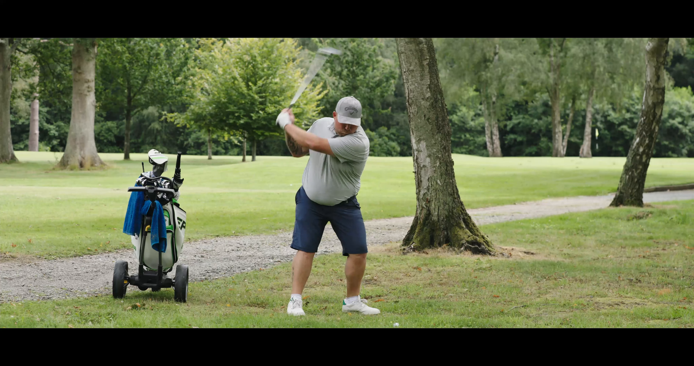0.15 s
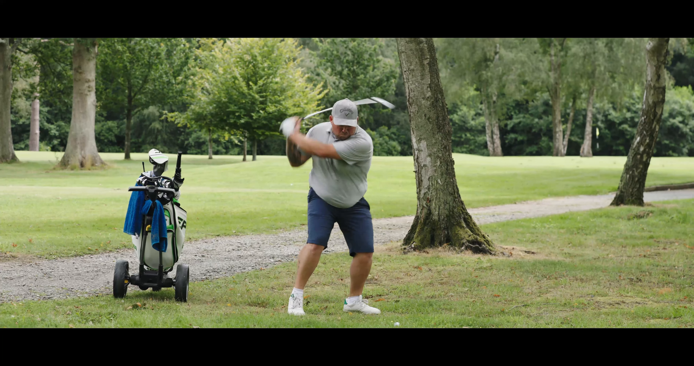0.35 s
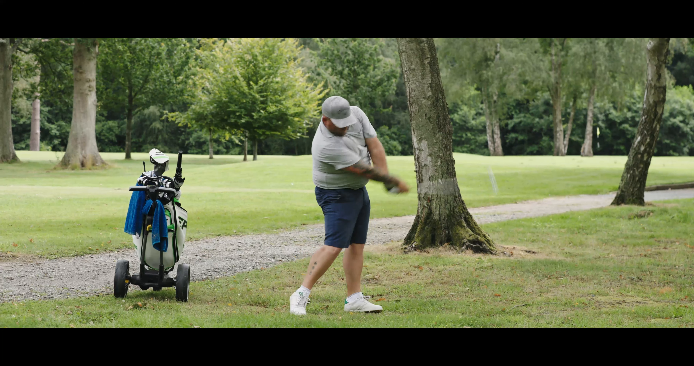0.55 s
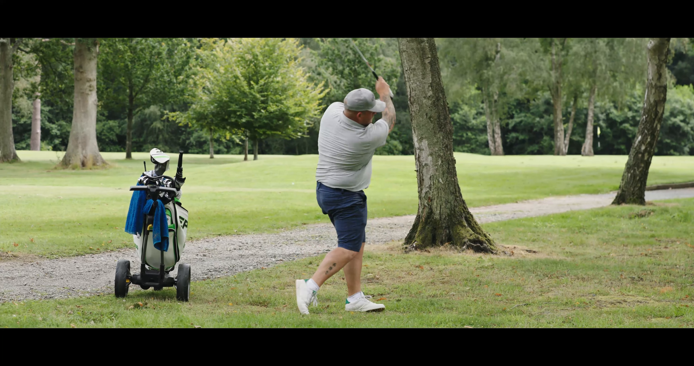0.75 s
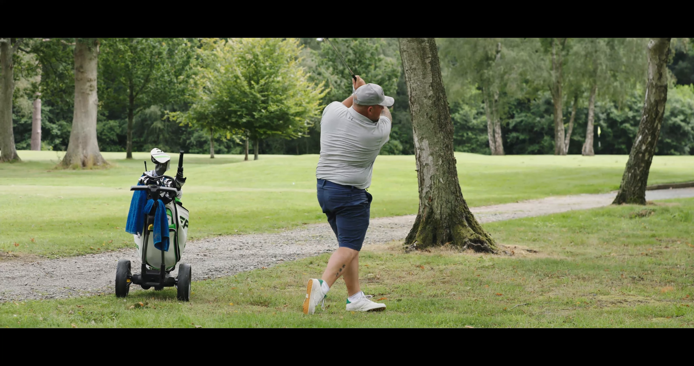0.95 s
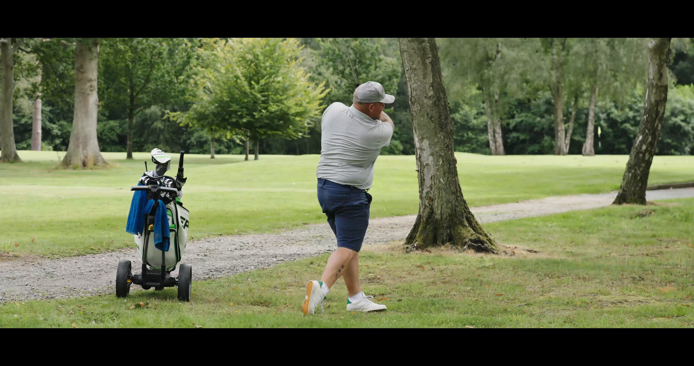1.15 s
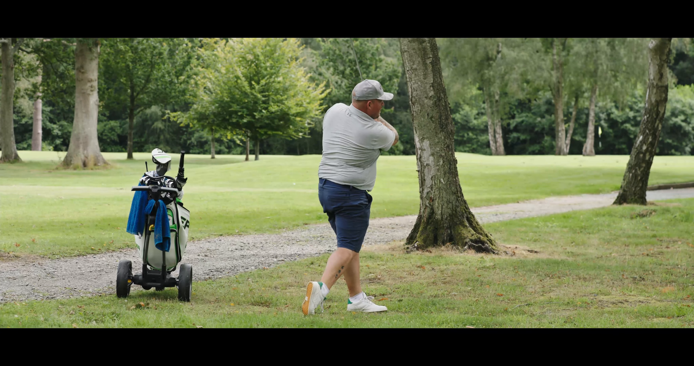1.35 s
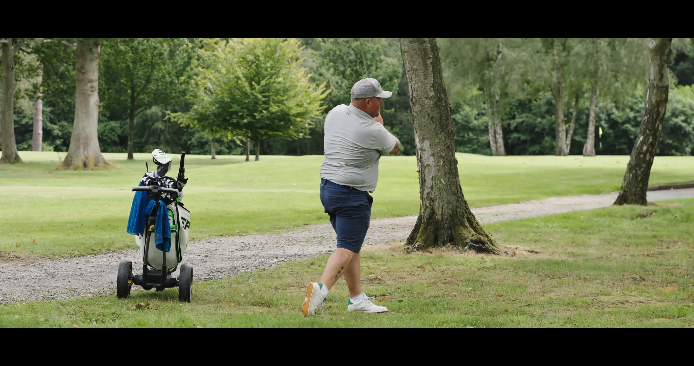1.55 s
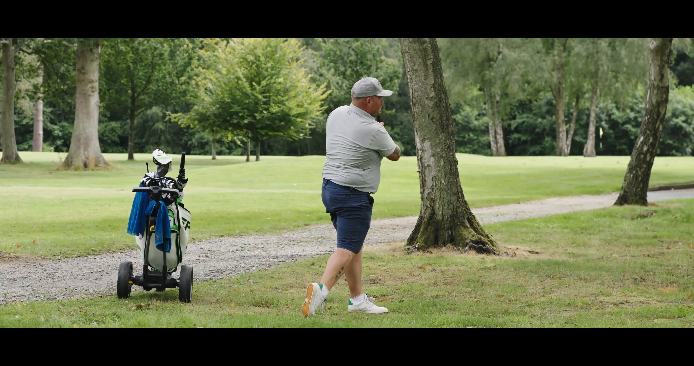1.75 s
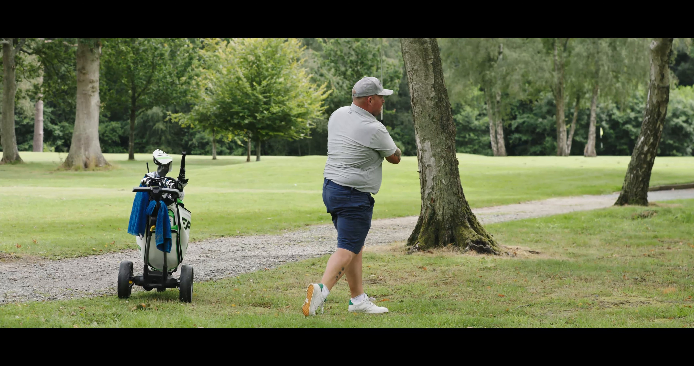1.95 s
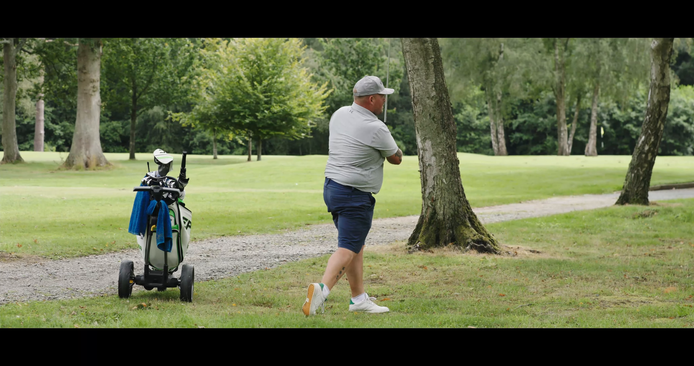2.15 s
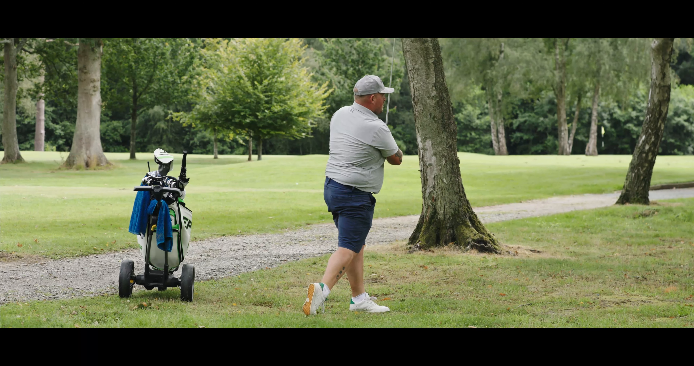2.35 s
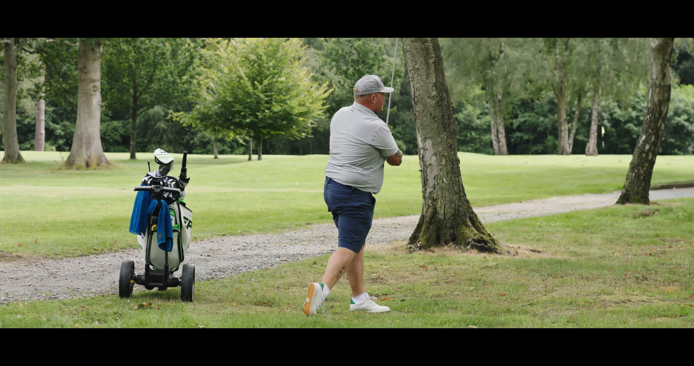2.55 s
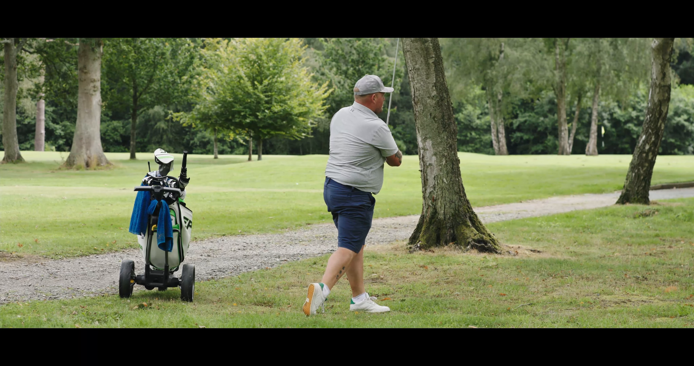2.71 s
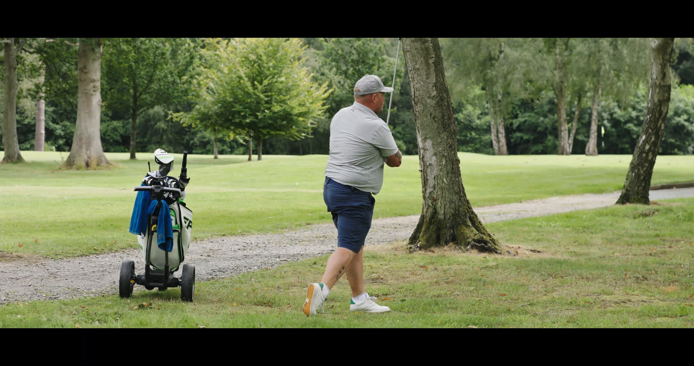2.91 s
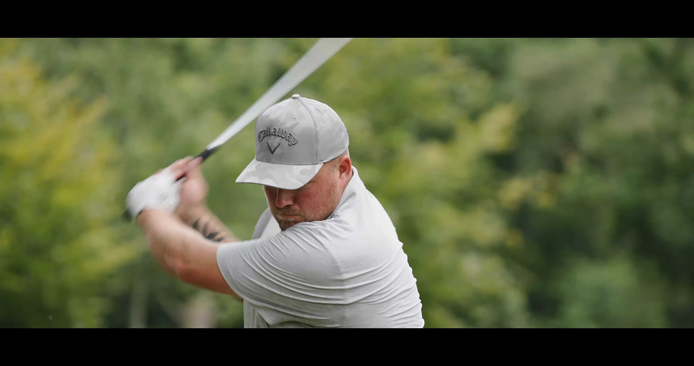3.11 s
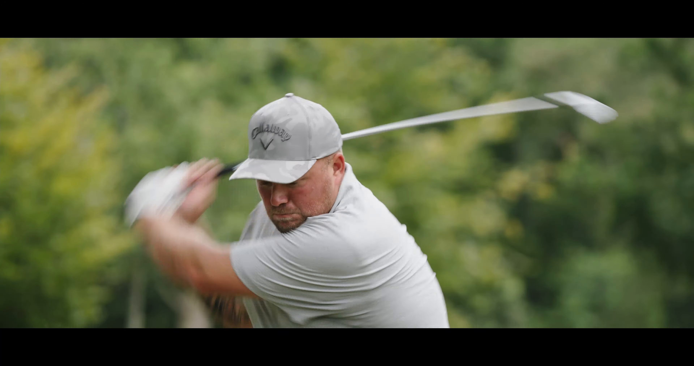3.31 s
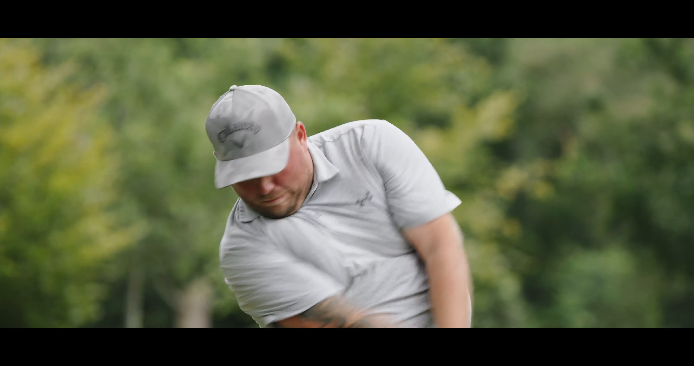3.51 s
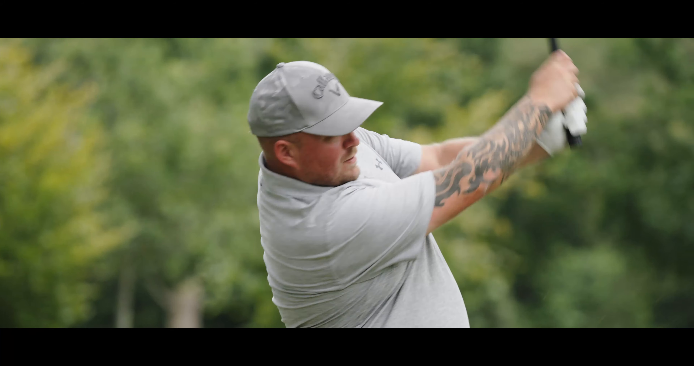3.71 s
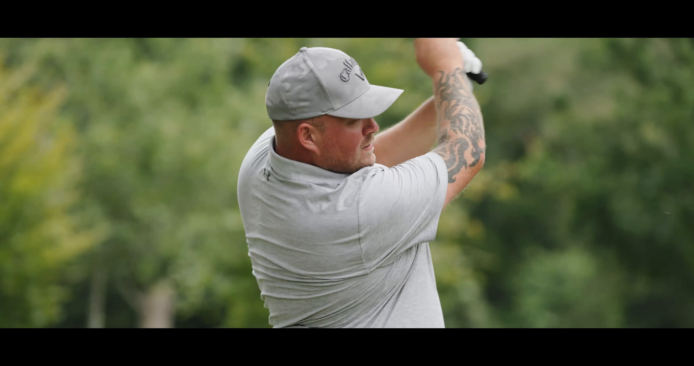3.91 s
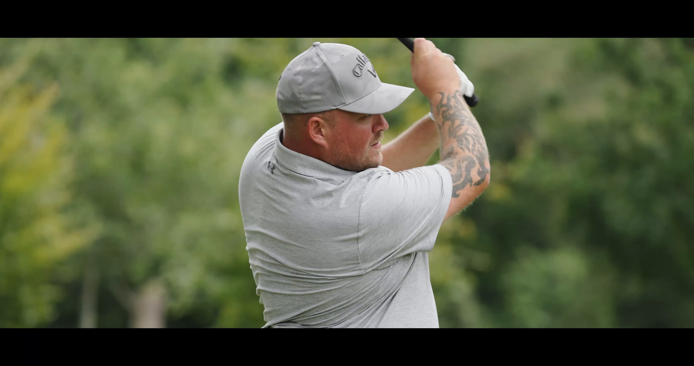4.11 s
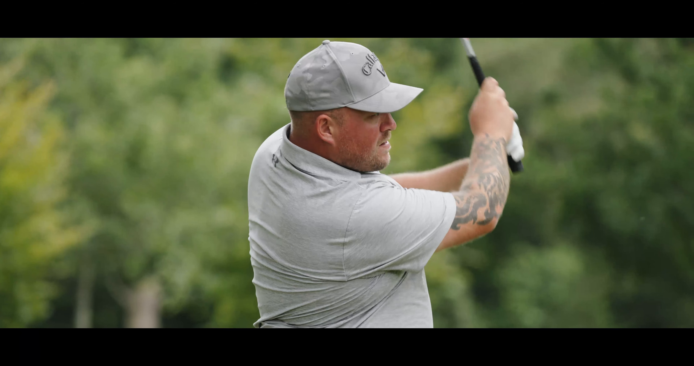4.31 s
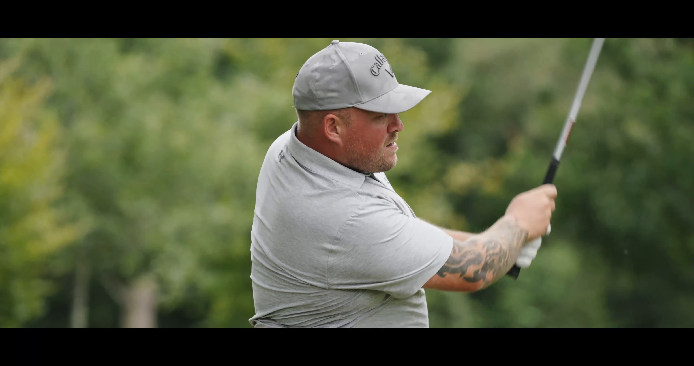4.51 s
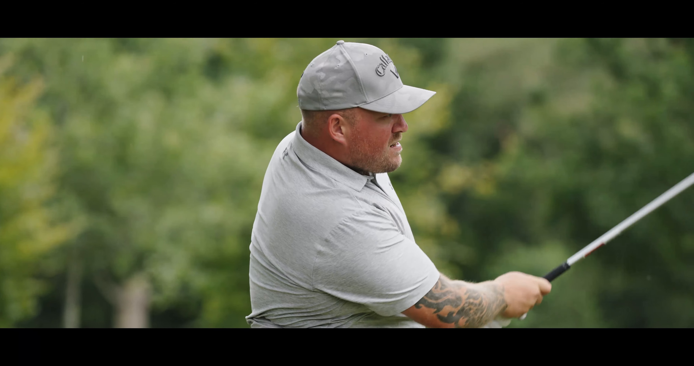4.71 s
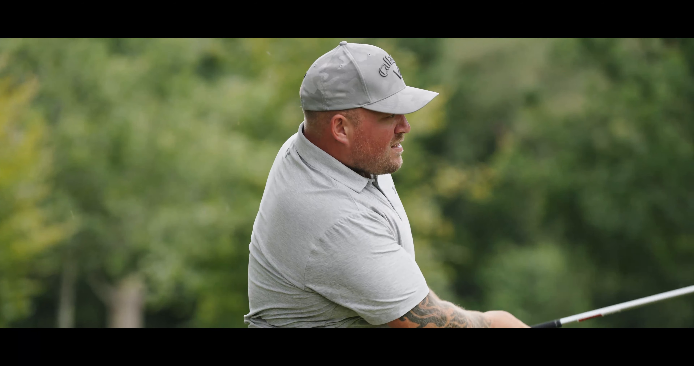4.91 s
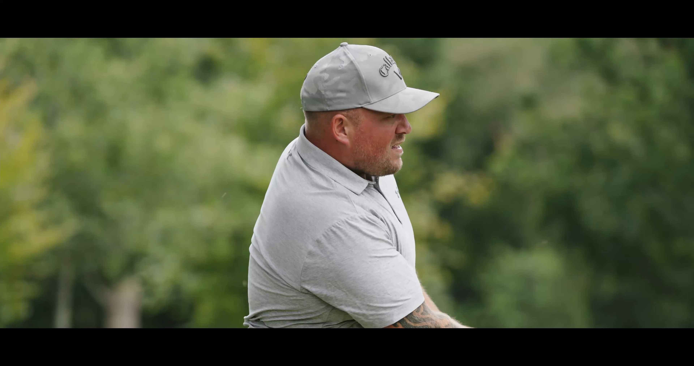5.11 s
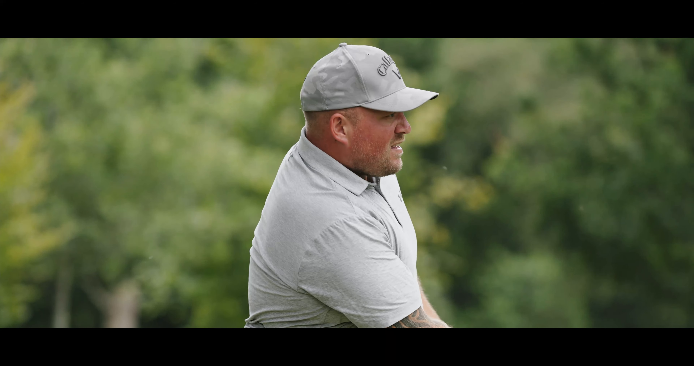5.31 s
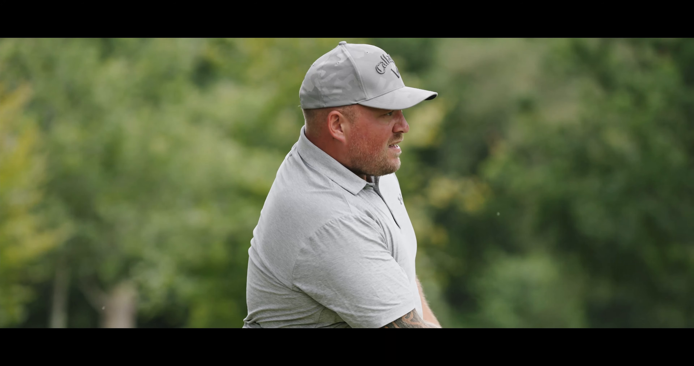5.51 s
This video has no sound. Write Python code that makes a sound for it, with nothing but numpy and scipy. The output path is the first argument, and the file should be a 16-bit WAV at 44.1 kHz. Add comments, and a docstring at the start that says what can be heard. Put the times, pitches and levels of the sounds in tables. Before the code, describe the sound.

On a quiet wooded golf course, a short airy swish ends in a very sharp club-on-ball crack with a tiny turf rip and scattered tree echoes. The ball knocks twice on wood, hollow and dry. The faint leafy hush steps slightly brighter, then a second swish and louder crack follow, with one softer, farther knock and a faint hoot. Mono, close strikes, slightly overloaded.

```python
"""Two iron shots on a tree-lined golf course, over a soft outdoor hush with a few low thuds.
First shot: the club swishes down as speed-tracking whistles and hiss, then cracks on the ball as a click
and cuts the turf as a noise burst; trees scatter the crack back. The ball knocks twice on wood (decaying modes).
The hush steps in level and colour. The second shot follows, with one knock farther off,
then one faint hoot, a sagging sine."""
import sys
import numpy as np
from scipy import signal
from scipy.io import wavfile
from scipy.ndimage import uniform_filter1d

SR = 44100
rng = np.random.default_rng(int(sys.argv[2]) if len(sys.argv) > 2 else 0)


def put_to_file(sound):
    """Save the sound as 16-bit audio at rate SR, in the file named by the first command-line argument."""
    columns = np.atleast_2d(sound).T  # one column per channel
    safe = np.clip(columns, -1, 1)
    whole_steps = np.round(safe * 32767)
    wavfile.write(sys.argv[1], SR, whole_steps.astype(np.int16))


N = 249606  # samples


def amp(db):
    """Decibels to gain."""
    return 10 ** (np.asarray(db) / 20)


def unit(x):
    """Scales to rms 1."""
    return x / np.sqrt(np.mean(x ** 2) + 1e-20)


def read(points, hz):
    """Interpolates a table on a log-frequency axis."""
    f, value = np.transpose(points)
    return np.interp(np.log(hz + 1), np.log(f + 1), value)


def seconds(length_s):
    """A time axis from zero."""
    return np.arange(round(length_s * SR)) / SR


def add(mix, start_s, sound):
    """Mixes a sound in place, cut at the end of the mix."""
    part = mix[max(round(start_s * SR), 0):][:len(sound)]
    part += sound[:len(part)]


def click(spectrum, size=2048):
    """The causal, minimum-phase click of a spectrum, with energy 1."""
    hz = abs(np.fft.fftfreq(size, 1 / SR))
    log_gain = np.log(amp(read(spectrum, hz)))
    response = np.exp(np.conj(signal.hilbert(log_gain)))
    wave = np.fft.ifft(response).real[:size // 2]
    return wave / np.linalg.norm(wave)


def colour(x, spectrum):
    """Gives white excitation a spectrum at the same power."""
    return signal.fftconvolve(x, click(spectrum))[:len(x)]


def band(hz, width_hz, t):
    """Noise of rms 1 in a narrow band around a fixed or moving frequency."""
    f = np.fft.fftfreq(2 * SR, 1 / SR)
    random_phase = 2j * np.pi * rng.random(len(f))
    slow = np.fft.ifft(np.exp(random_phase - 2 * (f / width_hz) ** 2))[:len(t)]
    carrier = np.exp(2j * np.pi * np.cumsum(hz + 0 * t) / SR)
    return unit((slow * carrier).real)


def dull(x, top_hz=7500, order=8):
    """Soft contact and the way through the air take off the top."""
    return signal.sosfilt(signal.butter(order, top_hz, fs=SR, output="sos"), x)


# decay among the trees: (frequency [Hz], t60 [s])
TREE_DECAYS = [(150, 0.74), (1300, 1.22), (3000, 1.86), (6700, 1.24), (9000, 0.98), (14000, .4)]


def trees(spectrum, near, delay_s, spread_s, power, grain_db):
    """Countless small echoes: a few from the ground, the bulk from the trees, thinning with distance."""
    t = seconds(1)
    grain = np.repeat(rng.standard_normal(SR), 40)[:SR]  # level held for 40 samples
    taps = unit(rng.standard_normal(SR) * amp(grain_db * grain))
    hz, at, z = signal.stft(taps, SR, nperseg=256)
    decay = amp(-60 * at / read(TREE_DECAYS, hz)[:, None])
    taps = signal.istft(z * decay, SR, nperseg=256)[1][:SR]
    arrival = near + (1 - near) * .5 * (1 + np.tanh((t - delay_s) / 0.0075))
    onset = 1 - np.exp(-t / 0.0013)
    thinning = (1 + (t / spread_s) ** 2) ** power
    return colour(taps * arrival * onset / thinning, spectrum)


# club on ball: (time [s], crack peak [dB], turf gain [dB], turf length [s],
#                second snap delay [s], second snap peak [dB], tree echo gain [dB])
STRIKES = [(0.5745, 0.5, -17, 0.007, .0058, -7.5, -18.5), (3.5311, 3, -14.5, 0.0081, 0.0048, -6.5, -18.5)]
# crack spectrum, one list per strike: (frequency [Hz], density [dB per Hz])
CRACK_SPECTRA = [
    [(88, -75), (150, -18), (566, -9.5), (1160, 1.5), (1740, -5.5), (3190, -4.5), (4570, -17.5), (6190, -3),
     (7200, -16), (7770, -24), (8550, -20), (9580, -32), (14000, -50)],
    [(88, -44), (150, -10), (623, -8), (1120, -1), (2630, 1), (3710, -1), (5120, -10), (5850, 2),
     (7200, -8.5), (7920, -13), (8710, -16), (9760, -32), (14000, -37)],
]
# its tree echo, one list per strike: (frequency [Hz], density [dB per Hz])
CRACK_ECHO_SPECTRA = [
    [(150, -17), (450, -16), (1100, -8.5), (1800, -7.5), (2500, -10.5), (3300, -9), (4200, -5.5),
     (5000, -10), (6000, -1.5), (6800, 2.5), (7800, -14.5), (9500, -26.5), (11500, -38), (14000, -71)],
    [(150, -23), (450, -16), (1100, -16), (1800, -13.5), (2500, -9), (3300, -14.5), (4200, -7), (5000, -8),
     (6000, -1.5), (6800, 1), (7800, -9), (9500, -24.5), (11500, -42), (14000, -60)],
]


def strike(row, crack, echo):
    """The face cracks on the ball, rips through the turf for a few milliseconds and snaps once more."""
    start_s, crack_db, turf_db, turf_s, snap_s, snap_db, echo_db = row
    t = seconds(1)
    pulse = dull(click(crack), top_hz=9060)
    pulse = pulse / abs(pulse).max()
    rip = rng.standard_normal(SR) * .5 * (1 - np.tanh((t - turf_s) / 0.00067))
    sound = amp(turf_db) * dull(colour(rip, crack), top_hz=9400)
    add(sound, 0, amp(crack_db) * pulse)
    add(sound, snap_s, -amp(snap_db) * pulse)  # opposite polarity
    tail = trees(echo, near=0.61, delay_s=0.029, spread_s=0.06, power=0.59, grain_db=1.0)
    return start_s, sound + amp(echo_db) * tail


# ball on wood: (time [s], ring gain [dB], tick gain [dB], tree echo gain [dB])
KNOCKS = [(1.077, -13, -19.5, -26), (1.1909, -10, -22, -27), (4.697, -19, -32.5, -38)]
# wood modes, one list per knock: (frequency [Hz], level [dB], t60 [s])
WOOD_MODES = [
    [(226, -19, 0.1), (430, -13, 0.035), (990, -1.5, 0.024), (1412, -0.5, 0.06), (1660, -12, 0.039),
     (2010, -5.5, 0.027), (2500, -2.5, 0.039), (3525, -8, 0.026)],
    [(793, -11, 0.022), (1004, -0.5, 0.016), (1363, -1, 0.04), (1760, -10.5, 0.029), (2040, -5, 0.039),
     (3800, -15, 0.037), (4540, -13, 0.036)],
    [(696, -11, 0.033), (925, -4.5, 0.026), (1176, -2.5, 0.036), (1830, -2, 0.023), (2080, -2, 0.018)],
]
# tick on bark: (frequency [Hz], density [dB per Hz])
TICK_SPECTRUM = [(150, -23), (700, 2.5), (1800, 4), (3600, -7), (5200, -3.5), (6800, -4), (8000, -22),
                 (10000, -43), (14000, -71)]
# tree echo, one list per knock: (frequency [Hz], density [dB per Hz])
KNOCK_ECHO_SPECTRA = [
    [(150, -28), (600, -13), (1000, -13), (1320, 0.5), (1700, -6), (2100, -8.5), (2800, -17.5), (3800, -15),
     (5400, -25), (7000, -18.5), (8000, -37), (10000, -52), (13000, -78.5)],
    [(150, -23.5), (600, -18), (1000, -9.5), (1320, 0.5), (1700, -8), (2100, -4.5), (2800, -18),
     (3800, -15.5), (5400, -21.5), (7000, -17.5), (8000, -33), (10000, -54), (13000, -74)],
    [(150, -9.5), (600, -2.5), (1000, -3), (1320, -4), (1700, -2), (2100, 1), (2800, -17), (3800, -7),
     (5400, -10), (7000, -7.5), (8000, -25.5), (10000, -46), (13000, -60.5)],
]


def knock(row, modes, echo):
    """The ball ticks on the bark and rings the wood's short modes."""
    start_s, ring_db, tick_db, echo_db = row
    t = seconds(1)
    ring = np.zeros(len(t))
    for k, (hz, db, t60_s) in enumerate(modes):
        polarity = (-1) ** k
        ring += polarity * amp(db - 60 * t / t60_s) * np.sin(2 * np.pi * hz * t)
    tick = colour(rng.standard_normal(SR) * np.exp(-t / 0.0052), TICK_SPECTRUM)
    tail = trees(echo, near=0.83, delay_s=0.03, spread_s=0.055, power=0.33, grain_db=2.5)
    return start_s, amp(ring_db) * dull(ring) + amp(tick_db) * tick + amp(echo_db) * tail


def trunk_echo(start_s, peak_db, low_hz, high_hz, smear_s):
    """A trunk returns one band of the sound, smeared by its bark and branches."""
    t = seconds(.1)
    smear = rng.standard_normal(len(t)) * np.exp(-t / smear_s)
    bandpass = signal.butter(3, [low_hz, high_hz], "band", fs=SR, output="sos")
    wave = dull(signal.sosfilt(bandpass, smear))
    return start_s, amp(peak_db) * wave / abs(wave).max()


# single trunks, a row per strike, then per knock: (nearest echo peak [dB], low edge [Hz],
#                high edge [Hz], smear [share of delay], delays [list of s])
TRUNKS = [(-14, 2800, 8000, 0.046, [.0233, .047]), (-8, 5300, 7900, 0.02, [.013, .023, .0564, .1666]),
          (-13, 1110, 2300, 0.12, [.027, .035]), (-24, 1100, 2400, .08, [.0456]),
          (-25, 950, 2250, 0.082, [.031, .039, .052, .076])]
TRUNK_FALL_DB = 4.5  # per doubling of the delay


def trunk_echoes(hit_s, row):
    """A hit comes back from a few trunks: the farther the trunk, the weaker and more smeared."""
    nearest_db, low_hz, high_hz, smear_share, delays_s = row
    echoes = []
    for delay_s in delays_s:
        peak_db = nearest_db - TRUNK_FALL_DB * np.log2(delay_s / delays_s[0])
        echoes.append(trunk_echo(hit_s + delay_s, peak_db, low_hz, high_hz, smear_share * delay_s))
    return echoes


# lingering ring of the far wood: (time [s], level [dB], starting frequency [Hz],
#                glide [octaves per s], width [Hz], rise [s], t60 [s])
FAR_RINGS = [(1.1, -45.5, 1325, -.02, 135, .03, 3.7), (4.8, -39, 1930, -.7, 380, 0.26, 1.9),
             (4.77, -44.5, 1250, -.2, 450, 0.02, 1.7)]


def far_ring(start_s, db, hz, glide, width_hz, rise_s, t60_s):
    """The knock's strongest band keeps returning from deeper in the wood, gliding down as it fades."""
    t = seconds(2)
    fade = (1 - np.exp(-t / rise_s)) * np.exp(-np.log(1000) * t / t60_s)
    return start_s, amp(db) * fade * band(hz * 2 ** (glide * t), width_hz, t)


# downswings: (time of top speed [s], level [dB], top speed [share of a full swing],
#                speeding up [s], slowing [s])
SWINGS = [(.543, -32, 1.0, .022, .028), (3.505, -32, 1.08, .021, 0.0263)]
# hiss of the swish: (frequency [Hz], density [dB per Hz])
SWISH_HISS = [(200, -6), (1500, 0.5), (4000, -2), (5200, -7.5), (6800, 0), (8000, -16), (11000, -40),
              (15000, -57)]
SLOW_SHARE = .6  # speed at the swish's start and end, share of top speed


def swish(row, head_hz=680, head_steady=0.54, head_hold=0.89, shaft_hz=1200, shaft_db=-1,
          tip_hz=2450, tip_db=-9.0, hiss_db=-7.0):
    """Eddies off the head and tapering shaft whistle at pitches that follow the club's speed."""
    peak_s, level_db, top_speed, rise_s, fall_s = row
    t = seconds(.2) - .1
    effort = np.exp(-.5 * (t / np.where(t < 0, rise_s, fall_s)) ** 2)
    speed = top_speed * (SLOW_SHARE + (1 - SLOW_SHARE) * effort)  # 1 = full swing
    tone = unit(np.sin(2 * np.pi * np.cumsum(head_hz * speed) / SR))
    head = head_steady * tone + 0.64 * band(head_hz * speed, 255, t)
    shaft = amp(shaft_db) * band(shaft_hz * speed, 1030, t)
    tip = amp(tip_db) * band(tip_hz * speed ** 2, 1100, t)  # the thin end sweeps up fastest
    hiss = amp(hiss_db) * colour(rng.standard_normal(len(t)), SWISH_HISS)
    # the head sounds first and longest
    air = effort ** head_hold * head + effort * speed ** 2 * (shaft + tip + hiss)
    return peak_s + t[0], amp(level_db) * unit(air) * np.sqrt(np.mean(effort ** 2))


# low thuds: (time of peak [s], level [dB], centre [Hz], length [s])
THUDS = [(.522, -46.5, 107, .015), (.603, -43.5, 110, 0.011), (.808, -44, 165.7, 0.015),
         (.827, -45.5, 75.6, 0.013), (1.838, -51, 80.6, .015), (2.237, -42, 299, .0045),
         (3.547, -37.5, 378.4, 0.015)]
THUD_WIDTH_HZ = 102  # for a 100 Hz thud; grows with the root of the pitch


def thud(peak_s, db, hz, length_s):
    """A dull push of air with no ring: a narrow noise band under a bell."""
    t = seconds(.2) - .1
    bell = np.exp(-.5 * (t / length_s) ** 2)
    width_hz = THUD_WIDTH_HZ * np.sqrt(hz / 100)
    push = unit(bell * band(hz, width_hz, t))
    return peak_s + t[0], amp(db) * push * np.sqrt(np.mean(bell ** 2))


# hoot, one row: (length [s], level [dB], starting frequency [Hz])
HOOT = (0.082, -44, 500)
HOOT_AT_S, HOOT_ATTACK_S, HOOT_RELEASE_S, HOOT_SAG_HZ_PER_S = 4.893, 0.036, .022, 400


def hoot():
    """One faint, nearly pure note that swells, sags in pitch and stops."""
    length_s, db, hz = HOOT
    t = seconds(length_s)
    swell = np.minimum(t / HOOT_ATTACK_S, 1) * np.minimum((length_s - t) / HOOT_RELEASE_S, 1)
    note = unit(np.sin(2 * np.pi * np.cumsum(hz - HOOT_SAG_HZ_PER_S * t) / SR))
    return HOOT_AT_S, amp(db) * swell * note


# hush before the step: (frequency [Hz], density [dB per Hz])
HUSH_BEFORE = [(25, -9), (70, -5), (180, -3.5), (500, -0.5), (900, -1), (1500, -6), (2200, -8),
               (3200, -12.5), (5200, -18), (6900, -12.5), (7700, -24.5), (9000, -37.5), (11000, -49.5),
               (15000, -59.5)]
# hush after the step: (frequency [Hz], density [dB per Hz])
HUSH_AFTER = [(25, -40), (70, -7.5), (180, -1), (500, -2), (900, -0.5), (1500, -4.5), (2200, -7.5),
              (3200, -10), (5200, -13), (6900, -6), (7700, -16), (9000, -29.5), (11000, -43.5),
              (15000, -62.0)]
HUSH_BEFORE_DB, HUSH_AFTER_DB, HUSH_STEP_S = -48, -45.5, 3.148


def hush(patch_db=1.0, swell_db=-0.5):
    """Distant air and leaves: noise drifting a little in level and colour, with one step."""
    hz, at, z = signal.stft(rng.standard_normal(N), SR, nperseg=1024)
    patches = uniform_filter1d(rng.standard_normal(z.shape), size=14, axis=0)
    patches = unit(uniform_filter1d(patches, size=9, axis=1))
    swell = unit(uniform_filter1d(rng.standard_normal(len(at)), size=30))
    z = z * amp(patch_db * patches + swell_db * swell)

    def shaped(spectrum):
        """The drifting noise under one spectrum, rms 1."""
        return unit(signal.istft(z * amp(read(spectrum, hz))[:, None], SR, nperseg=1024)[1][:N])

    before = amp(HUSH_BEFORE_DB) * shaped(HUSH_BEFORE)
    after = amp(HUSH_AFTER_DB) * shaped(HUSH_AFTER)
    return np.where(np.arange(N) / SR < HUSH_STEP_S, before, after)


def scene():
    """All sources at one microphone."""
    mix = hush()
    sounds = [*map(swish, SWINGS)]
    sounds += map(strike, STRIKES, CRACK_SPECTRA, CRACK_ECHO_SPECTRA)
    sounds += map(knock, KNOCKS, WOOD_MODES, KNOCK_ECHO_SPECTRA)
    sounds.append(hoot())
    for hit, row in zip([*STRIKES, *KNOCKS], TRUNKS):
        sounds += trunk_echoes(hit[0], row)
    sounds += [far_ring(*row) for row in FAR_RINGS]
    sounds += [thud(*row) for row in THUDS]
    for start_s, sound in sounds:
        add(mix, start_s, sound)
    return mix[None]


def record(dry, low_cut_hz=36, edge_hz=15800):
    """A low cut against wind; the cracks just overload the recorder; then the band limit."""
    lean = signal.sosfilt(signal.butter(2, low_cut_hz, "high", fs=SR, output="sos"), dry)
    clipped = np.clip(lean, -1, 1)
    lowpass = signal.firwin(255, edge_hz, window=("kaiser", 8), fs=SR)
    return signal.oaconvolve(clipped, lowpass[None], "same")


dry = scene()
out = record(dry)
put_to_file(out)
```